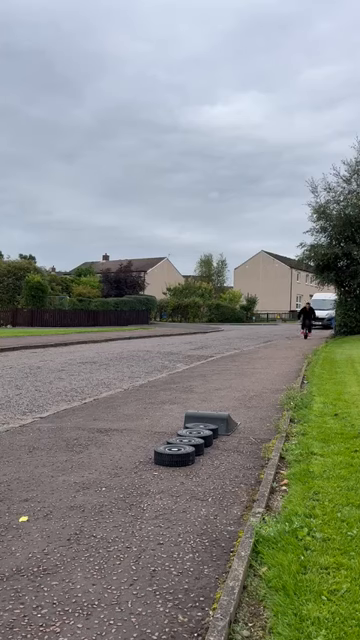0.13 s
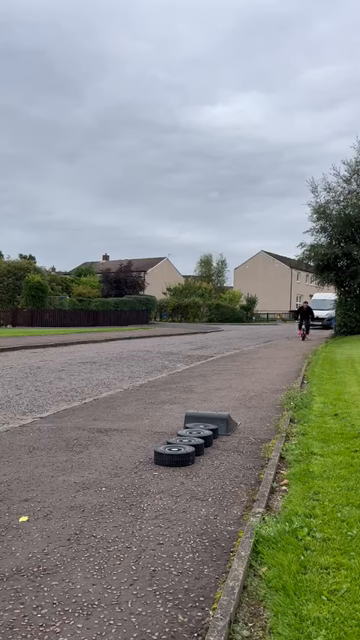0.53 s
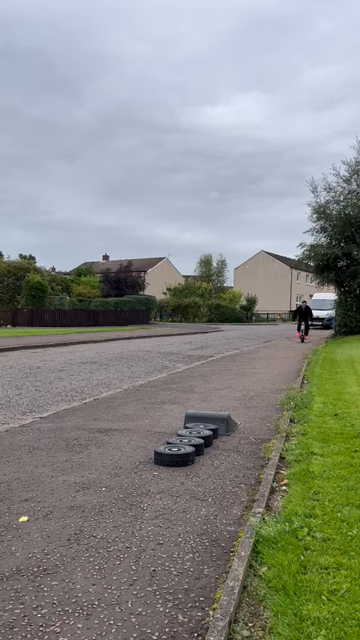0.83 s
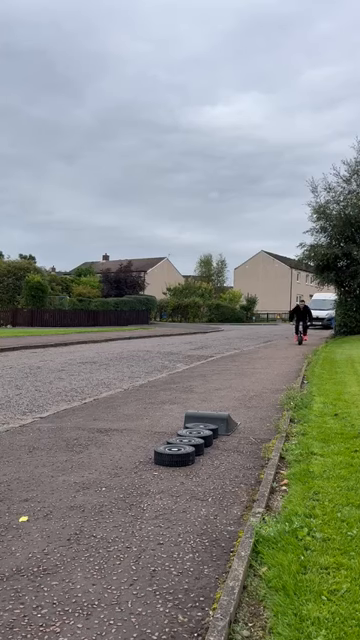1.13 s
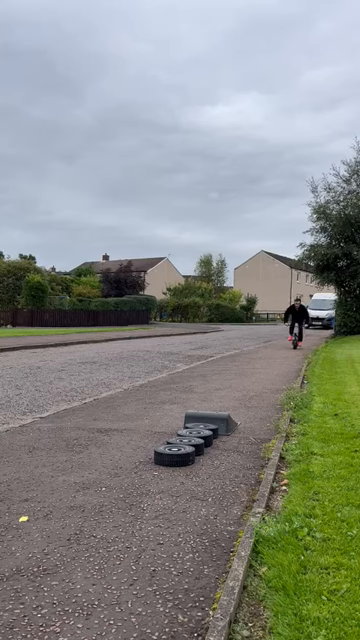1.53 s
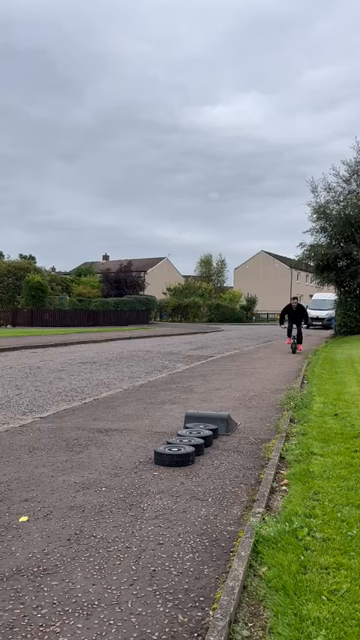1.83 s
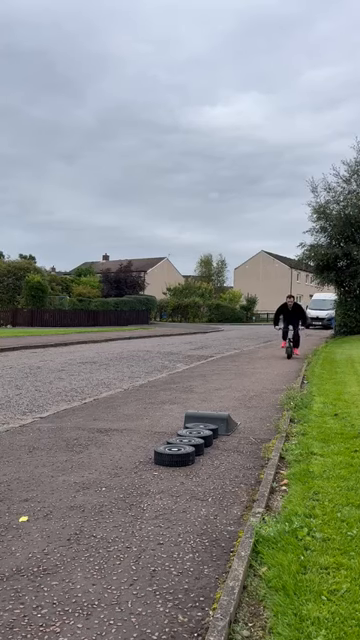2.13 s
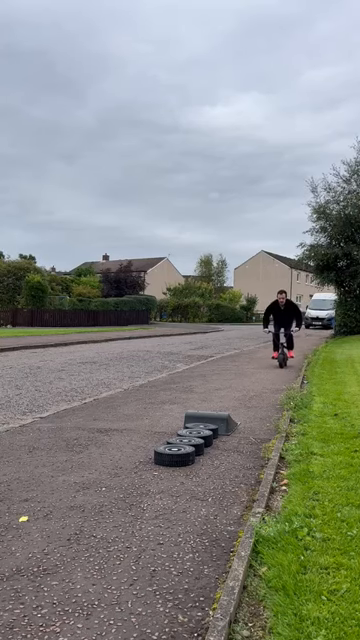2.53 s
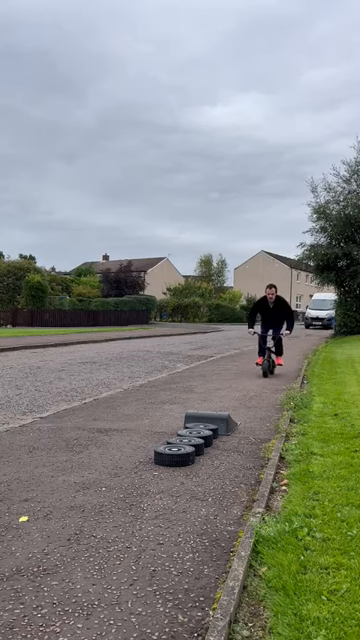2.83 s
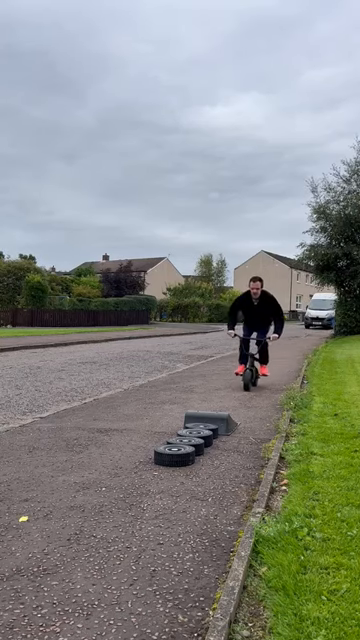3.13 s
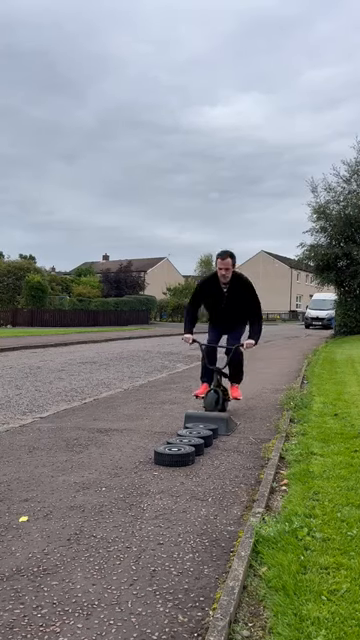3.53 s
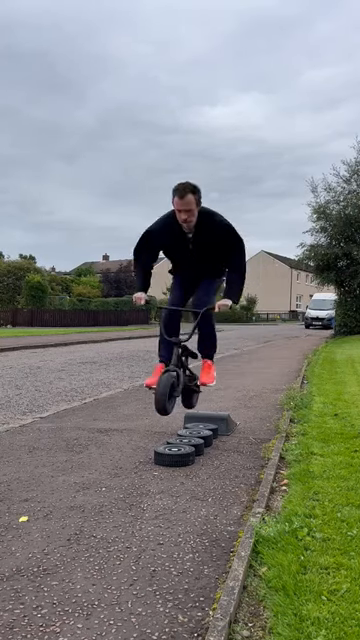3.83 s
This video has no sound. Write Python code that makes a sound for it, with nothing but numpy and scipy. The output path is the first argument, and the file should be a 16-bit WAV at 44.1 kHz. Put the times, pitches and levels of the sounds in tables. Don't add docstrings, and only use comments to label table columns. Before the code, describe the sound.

Small bike wheels strike a hollow ramp in a loud double clatter after rolling closer outdoors.

```python
import sys
import numpy as np
from scipy import signal
from scipy.fft import rfft, irfft
from scipy.io import wavfile
from scipy.ndimage import uniform_filter1d

SR = 44100
rng = np.random.default_rng(int(sys.argv[2]) if len(sys.argv) > 2 else 0)


def convert_level_to_amplitude(level_db):
    exponent = np.asarray(level_db, float) / 20
    return 10 ** exponent


def master_out(mix):
    frames = np.transpose(np.atleast_2d(mix))
    ceiling = np.clip(frames, -1, 1)
    pcm = np.round(ceiling * 32767).astype(np.int16)
    wavfile.write(sys.argv[1], SR, pcm)


N = 176400

# [pitch_hz, level_db per Hz]
TRAFFIC_COLOUR = [(15, -21), (25, 2), (194, -3), (435, -16), (1000, -17.5), (3370, -51.5), (5050, -29.5),
                  (5400, -25.5), (7020, -34), (11900, -120)]
# [pitch_hz, level_db per Hz]
HISS_COLOUR = [(2000, -10), (3500, 5), (5300, 19), (6200, -3), (8000, 13.5), (10300, -2), (11400, -18)]
# [time_s, level_db]
LEAF_SWELL = [(0, -15), (.45, -8), (.6, -2), (1.9, 4), (2.3, 0.5), (4, 0)]
# [pitch_hz, level_db per Hz]
RUSTLE_COLOUR = [(10900, -40), (11300, 0), (11700, 0), (11900, -40)]
# [time_s, level_db]
RUSTLE_SWELL = [(0, -96), (.8, -92), (1.05, -99), (1.3, -90), (2.1, -88), (2.3, -100), (3.5, -100),
                (4, -94)]
# [time_s, level_db]
WIND_SWELL = [(0, -50), (.4, -70), (1, -55), (1.6, -47.5), (2, -69.5), (2.35, -66), (2.65, -46), (3, -52),
              (3.4, -53), (3.9, -45.5), (4, -52)]
# [centre_s, peak_db, pitch_hz, length_s]
WIND_PUFFS = [(0.133, -31.5, 94, 0.016), (0.211, -50, 60.4, 0.13), (0.548, -39.5, 64.6, 0.057),
              (.6, -40, 170, 0.013), (0.619, -34, 96, 0.025), (.647, -39.5, 140, 0.013),
              (.71, -40.5, 89.5, 0.024), (0.839, -45.5, 60, 0.032), (1.052, -39.5, 74.4, 0.031),
              (1.198, -43, 59.5, 0.08), (1.468, -40.5, 87.5, 0.053), (1.561, -43, 110, .03),
              (1.689, -42, 75, .04), (1.765, -35, 140, 0.011), (1.779, -33.5, 59.5, 0.028),
              (2.495, -33, 86.5, 0.02), (2.735, -25.5, 75.4, 0.04), (2.706, -31, 80.5, 0.018)]
# [start_s, level_db, pitch_hz, length_s, glide_hz]
BIRD_CHIPS = [
    (0.35, -54, 5100, .04, 0),
    (1.235, -55.5, 5200, 0.054, -50),
    (2.321, -53, 5090, 0.039, 0),
    (0.535, -66.5, 7700, 0.056, -100),
    (0.19, -71, 8300, 0.027, 3),
    (1.59, -74, 5820, .16, -60),
    (0.825, -64, 5100, 0.044, 600),
    (3.885, -53.5, 8070, 0.055, 0),
    (3.98, -57, 4150, 0.021, -100),
]
# [pitch_hz, level_db per Hz]
TYRE_COLOUR = [(90, -58), (200, -2.5), (500, -6), (800, -16.5), (1400, -9.5), (2400, -19), (3200, -20.5),
               (5000, -32), (9500, -35), (11500, -48)]
# [time_s, level_db]
TYRE_APPROACH = [(0, -72), (.6, -66), (1.2, -62.5), (1.7, -60), (1.9, -59), (2.4, -58.5), (3, -56),
                 (3.55, -52.5)]
# [pitch_hz, level_db per Hz]
WHIRR_COLOUR = [(600, -1), (2000, -2.5), (3500, -2.5), (5200, -0.5), (6200, -12), (8000, -5), (9500, -2.5),
                (11200, -15.5)]
# [time_s, level_db]
WHIRR_SWELL = [(3.501, -67.5), (3.57, -56.5), (3.7, -57.5), (3.8, -56.5), (3.9, -53.5), (4., -62.5)]
TICK_STARTS = [1.05, 1.872, 3.188, 3.539, 3.544, 3.5455, 3.549, 3.5543, 3.5545, 3.6365, 3.641, 3.655, 3.67,
               3.734, 3.859, 3.878]
# [peak_db, pitch_hz, t60_s, spray_db]
METAL_TICKS = [(-47, 1030, 0.085, -23), (-50, 1250, 0.077, -3), (-45, 3030, 0.032, 4),
               (-42, 1300, 0.012, 2), (-34.5, 2600, 0.033, 2.5), (-26.5, 1210, 0.024, -10),
               (-27.5, 1000, 0.035, -8), (-16.5, 1300, 0.012, -17), (-27, 3300, 0.02, -2.5),
               (-27, 3300, 0.019, -3), (-34, 3000, 0.05, 3), (-19, 2800, 0.013, 1.5),
               (-36, 3500, 0.011, -3), (-51, 8300, 0.028, -11), (-49.5, 3050, 0.067, -15),
               (-46.5, 1900, 0.046, -2)]
# [pitch_hz, level_db]
SPRAY_COLOUR = [(500, -3), (2000, 2.5), (4000, -8), (6000, -1), (8000, -13), (11500, -16), (12500, -34)]
SCRUB_STARTS = [
    3.554,
    3.6468,
]
# [level_db, length_s]
TREAD_SCRUBS = [
    (-27.5, 0.0087),
    (-24, 0.015),
]
# [pitch_hz, level_db per Hz]
SCRUB_COLOUR = [(300, -6.5), (800, -0.5), (2000, -18), (4000, -26.5), (12000, -55)]
# [start_s, force_db, contact_ms]
WHEEL_BLOWS = [(3.5545, -17.5, 0.35), (3.5562, -16, 0.54), (3.559, -11.5, 1.01), (3.5635, -11, 4.23),
               (3.571, -7.5, 3.7), (3.615, -23, 2.2), (3.647, -9.5, 1.11), (3.6511, -14, 1.65),
               (3.6541, -9, 0.89), (3.658, -9, 0.82), (3.6603, -11, 0.8), (3.6657, 1.5, 2.97),
               (3.73, -29, 3.3), (3.76, -30.5, 3.7), (3.797, -25.5, 2.94), (3.825, -33, 2.5),
               (3.886, -33.5, 3.1)]
# [pitch_hz, level_db, t60_s]
RAMP_MODES = [(107, -15, 0.068), (140, 1, 0.082), (177, -6, 0.058), (207.4, -2.5, 0.05), (286.4, 0, 0.0396),
              (357, -7, 0.032), (527, -2.5, 0.056), (705, -12, 0.041), (830, -1.5, 0.029),
              (973, -10.5, 0.021), (1104, -11.5, 0.038), (1217, -9.5, 0.025), (1530, -8, 0.015),
              (2130, -6.5, 0.02)]
# [pitch_hz, phase_rad]
STREET_PHASE = [(100, .03), (280, .1), (600, .4), (1200, .5), (1600, .1), (1900, .1), (2600, 1.4),
                (3400, .2), (4500, 1.6), (5200, 2.1), (5550, 3.0), (6700, 3.25), (7250, 6.1), (8800, 6.45),
                (9350, 9.2), (10700, 9.7), (11300, 12.)]
# [pitch_hz, phase_rad]
RAMP_PHASE = [(100, 0.033), (400, 0.37), (900, 0.77), (1900, 0.23), (2600, 1.65), (4000, 0.74), (5000, 1.6),
              (6200, 2.48), (8600, 6.6), (12000, 11.8)]
# [pitch_hz, level_db]
STREET_OPPOSED = [(60, -8.5), (280, -17), (600, -3.5), (1200, -5), (1750, -25), (3000, -8.5), (6200, -12),
                  (8000, -22), (10000, -2), (11500, -6)]
# [pitch_hz, level_db]
RAMP_BALANCE = [(60, 0.5), (150, 0), (350, 0.0), (850, -1), (2060, 0.5), (4990, -1.5), (12100, 1)]


def evened(x):
    return x / np.sqrt(np.mean(x ** 2) + 1e-20)


def read(points, hz):
    f, value = np.transpose(points)
    return np.interp(np.log(hz + 1), np.log(f + 1), value)


def swell(points):
    return np.interp(np.arange(N) / SR, *np.transpose(points))


def add(mix, s, sound):
    part = mix[round(s * SR):][:len(sound)]
    part += sound[:len(part)]


def colour(x, points):
    return irfft(rfft(x) * convert_level_to_amplitude(read(points, np.fft.rfftfreq(len(x), 1 / SR))), len(x))


def drift(size):
    return evened(uniform_filter1d(uniform_filter1d(rng.standard_normal(N), size=size), size=size))


def patchy(points, patchy_db, flicker_db):
    frames = N // 128 + 5
    a, b, c, d, p = rng.standard_normal((frames, 257, 5)).T
    patches = uniform_filter1d(uniform_filter1d(p, size=7, axis=0), size=24, axis=1)
    flicker = uniform_filter1d(rng.standard_normal(frames), size=5)
    field = patchy_db * evened(patches) + flicker_db * evened(flicker)
    grains = np.array([a + 1j * b, c + 1j * d]) * convert_level_to_amplitude(field)
    x = signal.istft(grains, nperseg=512, noverlap=384)[1][:, :N]
    return evened(np.array([colour(v, points) for v in x]))


def street():
    hum_db, hiss_db = -49.5, -75.5
    hum = convert_level_to_amplitude(hum_db) * patchy(TRAFFIC_COLOUR, 2.5, 1.0)
    hiss = convert_level_to_amplitude(hiss_db + swell(LEAF_SWELL)) * patchy([(1500, -45)] + HISS_COLOUR, 2.1, 2.3)
    rustle = convert_level_to_amplitude(swell(RUSTLE_SWELL)) * evened(colour(rng.standard_normal(N), RUSTLE_COLOUR))
    return hum + hiss + rustle


def wind():
    rumble_hz, lumps_db = 60, 1.6
    band = signal.butter(2, [0.4 * rumble_hz, 1.38 * rumble_hz], "bandpass", fs=SR, output="sos")
    rumble = evened(signal.sosfilt(band, rng.standard_normal((2, N))))
    out = convert_level_to_amplitude(swell(WIND_SWELL) + lumps_db * drift(1500)) * rumble
    for (s, db, hz, length), turn in zip(WIND_PUFFS, rng.random(len(WIND_PUFFS))):
        t = np.arange(-length, length, 1 / SR)
        bump = np.exp(-(2.6 * t / length) ** 2)
        swing = np.cos(2 * np.pi * (hz * t * (1 - 2.6 * t) + turn))
        add(out[0], s - length, convert_level_to_amplitude(db) * bump * swing)
    return out


def birds():
    flutter_db, wobble_hz = 2, 61
    out = np.zeros(N)
    for s, db, hz, length, glide_hz in BIRD_CHIPS:
        u = np.arange(0, 1, 1 / (length * SR))
        unsteady = uniform_filter1d(rng.standard_normal((2, 9000)), size=120, axis=1)
        wobble, flutter = evened(unsteady)[:, :len(u)]
        shape = np.sin(np.pi * u ** .6) * convert_level_to_amplitude(db + flutter_db * flutter)
        pitch_hz = hz + glide_hz * (u - .5) + wobble_hz * wobble
        add(out, s, shape * np.sin(2 * np.pi * np.cumsum(pitch_hz) / SR))
    return out


def echoes(x):
    t60_s = 0.46
    taps, at = np.zeros((2, SR // 2)), np.arange(400, SR // 2 - 22, 22)
    at = at + rng.integers(0, 22, (2, len(at)))
    np.put_along_axis(taps, at, rng.choice([-1., 1.], at.shape), 1)
    taps = taps * convert_level_to_amplitude(-60 * np.arange(SR // 2) / SR / t60_s)
    return signal.fftconvolve(x[None], taps / np.linalg.norm(taps[0]), axes=1)[:, :N]


def tyres():
    grit_per_s, grit_db, tyre_db = 1500, -7, 5.5
    lift_s, lift_fade_s = 3.6, 0.19
    size = convert_level_to_amplitude(2.2 * np.minimum(rng.exponential(1, (2, N)), 3.5))
    hit = rng.random((2, N)) < grit_per_s / SR
    grains = size * hit * rng.choice([-1, 1], (2, N))
    grit = evened(np.array([colour(v, TYRE_COLOUR) for v in grains]))
    roar = patchy(TYRE_COLOUR, 2.4, 1.77)
    on_ground = np.clip((lift_s - np.arange(N) / SR) / lift_fade_s + .5, 0, 1)
    return convert_level_to_amplitude(swell(TYRE_APPROACH) + tyre_db) * on_ground * (roar + convert_level_to_amplitude(grit_db) * grit)


def free_wheels():
    return convert_level_to_amplitude(swell(WHIRR_SWELL)) * patchy(WHIRR_COLOUR + [(12500, -33)], 0.62, 0.83)


def chain_and_frame():
    attack_s = 0.00073
    t, out = np.arange(6000) / SR, np.zeros(N)
    for s, (db, hz, t60, spray_db) in zip(TICK_STARTS, METAL_TICKS):
        ring = np.sin(2 * np.pi * hz * t) + .5 * np.sin(2 * np.pi * 1.17 * hz * t)
        spray = convert_level_to_amplitude(spray_db) * evened(colour(rng.standard_normal(len(t)), SPRAY_COLOUR))
        add(out, s, convert_level_to_amplitude(db - 60 * t / t60) * np.minimum(t / attack_s, 1) * (1.04 * ring + spray))
    return out


def tread_scrub():
    attack_s, t60_s = 0.0019, 0.13
    t, level = np.arange(6000) / SR, np.zeros(N)
    for s, (db, length) in zip(SCRUB_STARTS, TREAD_SCRUBS):
        fade_db = 60 * np.maximum(t - length, 0) / t60_s
        add(level, s, convert_level_to_amplitude(db - fade_db) * np.minimum(t / attack_s, 1))
    return level * patchy([(100, -40)] + SCRUB_COLOUR, 3.0, 1.8)[0]


def ramp():
    edge_hz_ms, board_cut_hz, slap_ms = 357, 109, 2.2
    t, force = np.arange(9000) / SR, np.zeros(N)
    for s, db, contact_ms in WHEEL_BLOWS:
        push = np.sin(np.pi * np.arange(0, 1, 1000 / (contact_ms * SR))) ** 2
        patch = signal.butter(1, edge_hz_ms / contact_ms, "highpass", fs=SR)
        blow = signal.lfilter(*patch, np.pad(push, (0, 2000))) / push.sum()
        direction = np.sign(slap_ms - contact_ms)
        add(force, s, direction * convert_level_to_amplitude(db) * blow)
    body = sum(convert_level_to_amplitude(db - 60 * t / t60) * np.sin(2 * np.pi * hz * t) for hz, db, t60 in RAMP_MODES)
    ringing = signal.oaconvolve(force, body)[:N]
    return -.8 * signal.lfilter(*signal.butter(2, board_cut_hz, "highpass", fs=SR), ringing)


def ports(x, other, phase, opposed):
    flutter_db = 5.5
    hz = np.fft.rfftfreq(N, 1 / SR)
    own = np.array([other, 0.71 * np.roll(other, shift=700) - other]) * convert_level_to_amplitude(flutter_db * drift(1200))
    half = np.exp(.5j * read(phase, hz))
    return irfft(np.array([half, 1 / half]) * rfft(x) + convert_level_to_amplitude(read(opposed, hz)) * rfft(own), N)


def scene():
    echo_db = -18.5
    hits = ramp() + chain_and_frame() + tread_scrub()
    far = street() + tyres() + wind() + free_wheels()
    wet = convert_level_to_amplitude(echo_db) * echoes(hits)
    opposed = 3.5 * wet[1] + .6 * np.roll(hits, shift=130)
    near = ports(hits + wet[0], opposed, RAMP_PHASE, [(100, -47), (3000, -12)])
    tilt = convert_level_to_amplitude(.5 * read(RAMP_BALANCE, np.fft.rfftfreq(N, 1 / SR)))
    near = irfft(rfft(near) * np.array([tilt, 1 / tilt]), N)
    return near + ports(far[0] + birds(), far[1], STREET_PHASE, STREET_OPPOSED)


def gate(x):
    shut_below_db, depth_db, from_hz, open_db = -2.3, -24, 2200, 8
    hz, _, z = signal.stft(np.array([x[0] + x[1], x[0] - x[1]]) / 2, SR, nperseg=1024, noverlap=768)
    power = abs(z) ** 2 + 1e-20
    strip = abs(uniform_filter1d(uniform_filter1d(power, size=3, axis=1), size=9, axis=2))
    strip_log = np.log(strip + 1e-20)
    around = uniform_filter1d(uniform_filter1d(strip_log, size=25, axis=1), size=3, axis=2)
    low = 10 * (strip_log - around) / np.log(10) < shut_below_db
    treble_db = 10 * np.log10(strip[:, hz > from_hz].sum(axis=(0, 1)) + 1e-20)
    low = low * (treble_db < np.median(treble_db) + open_db)
    shut = uniform_filter1d(low * (hz > from_hz)[:, None] * 1., size=3, axis=2)
    mid, side = signal.istft(z * convert_level_to_amplitude(depth_db * shut), SR, nperseg=1024, noverlap=768)[1][:, :N]
    return np.array([mid + side, mid - side])


def low_pass(x):
    return signal.sosfilt(signal.butter(12, 12680, fs=SR, output="sos"), x)


def record(dry):
    start_s, bass_cut_hz, top_hz = .0362, 45, 11800
    bass_cut = signal.butter(2, bass_cut_hz, "highpass", fs=SR, output="sos")
    treble_cut = signal.cheby1(10, 1, top_hz, fs=SR, output="sos")
    gated = gate(signal.sosfilt(np.vstack([bass_cut, treble_cut]), dry))
    opening = np.clip((np.arange(N) / SR - start_s) / .001, 0, 1)
    return low_pass(gated * opening)


dry = scene()
out = record(dry)
master_out(out)
```